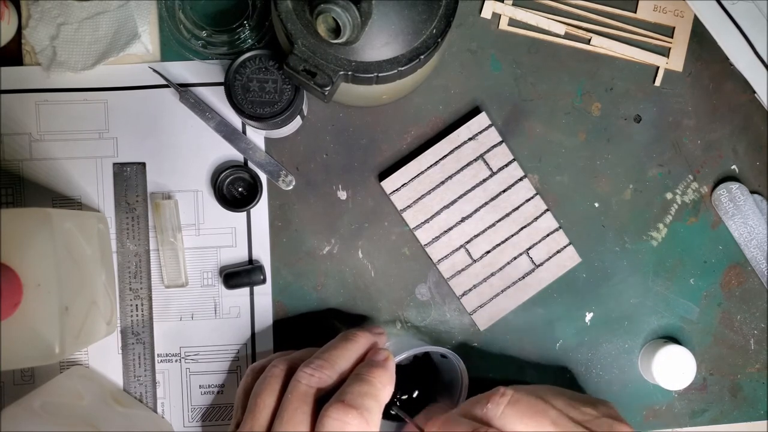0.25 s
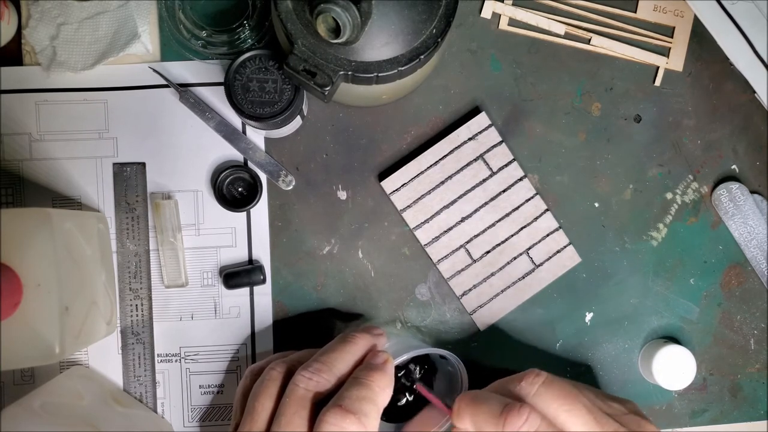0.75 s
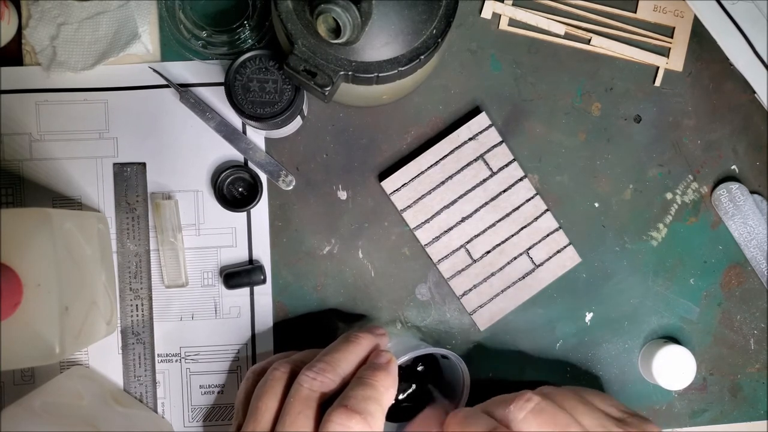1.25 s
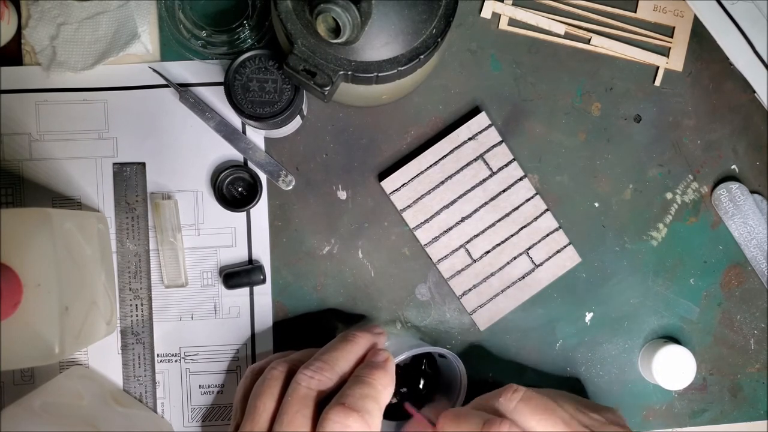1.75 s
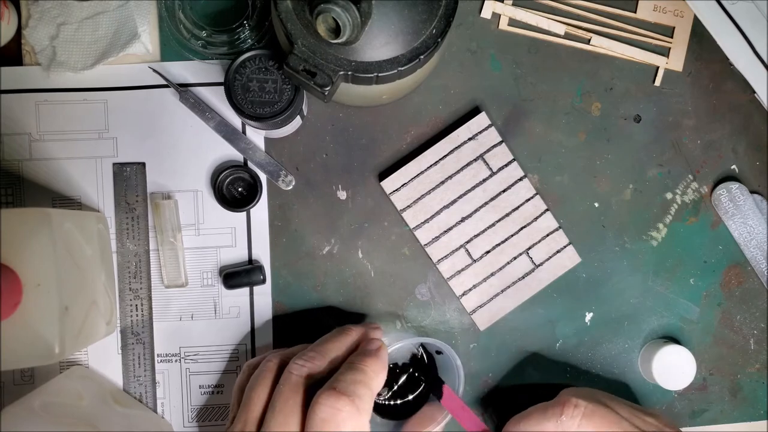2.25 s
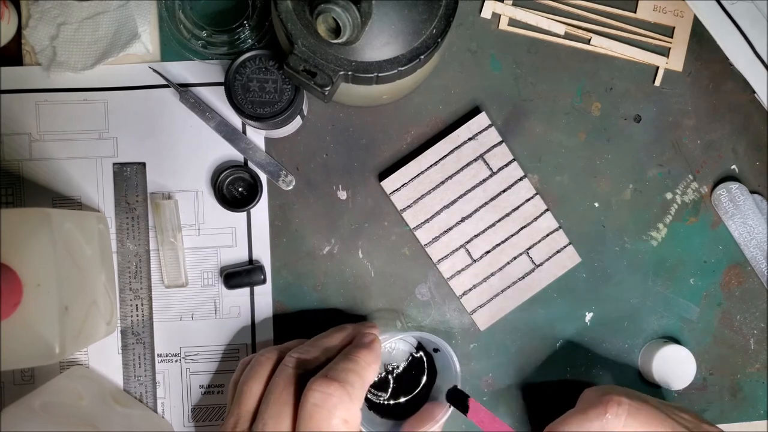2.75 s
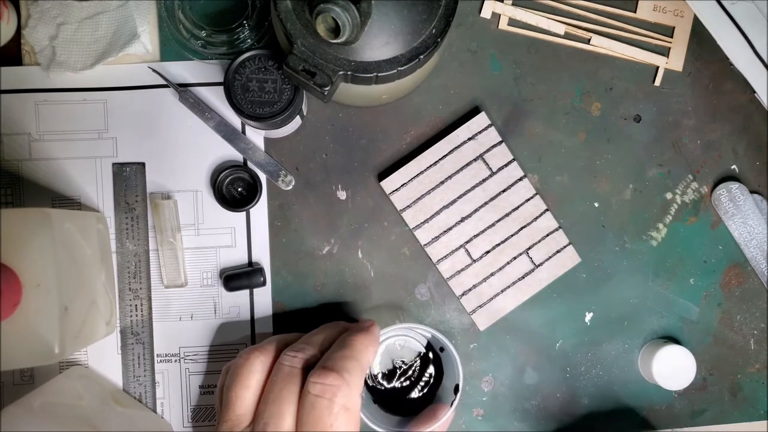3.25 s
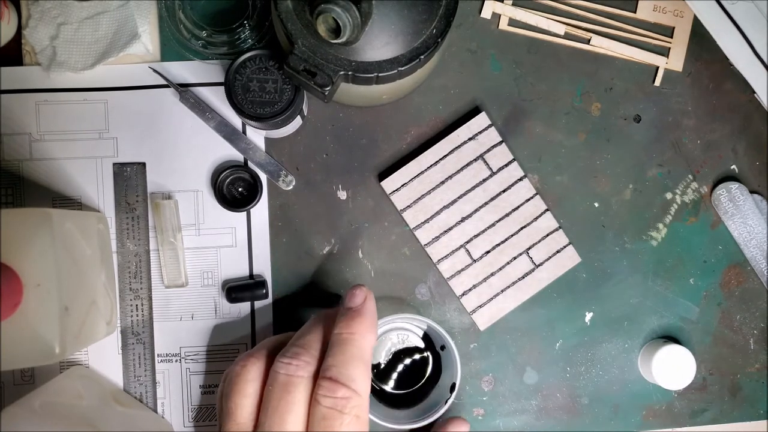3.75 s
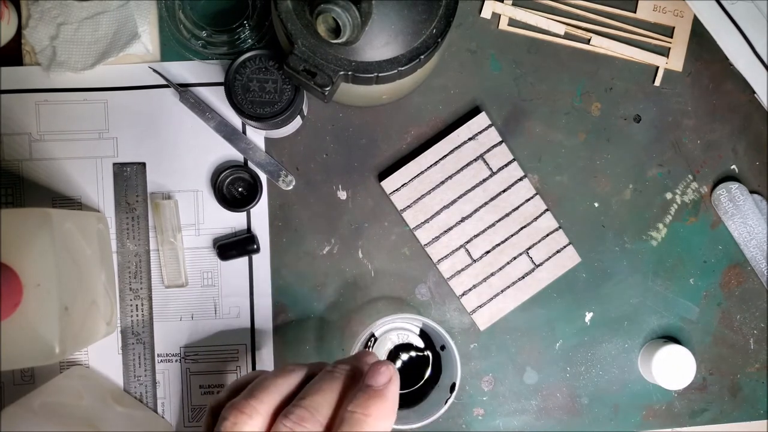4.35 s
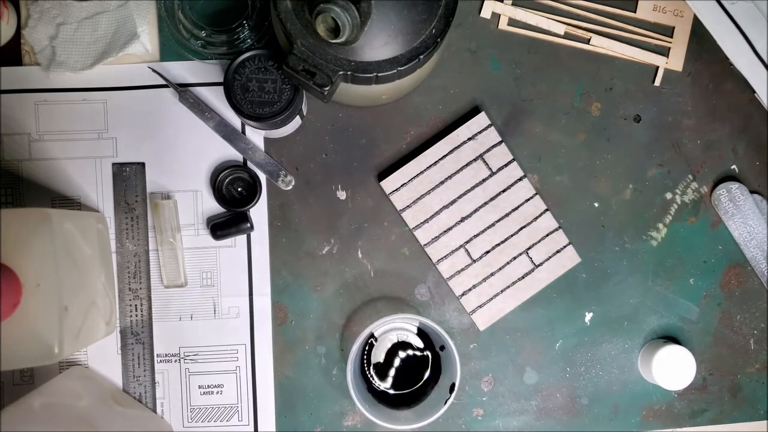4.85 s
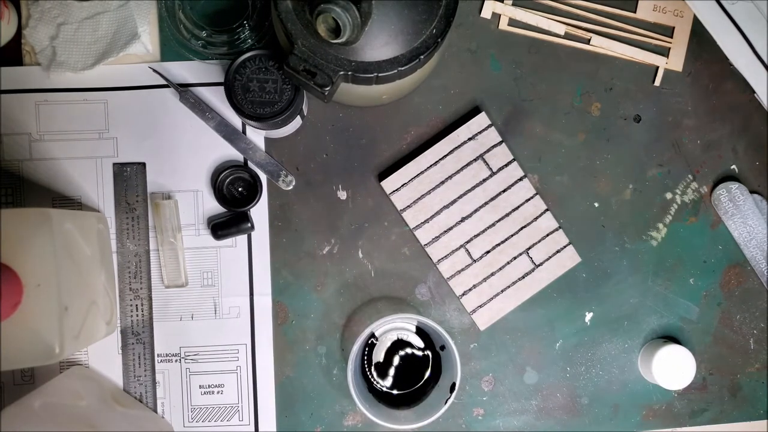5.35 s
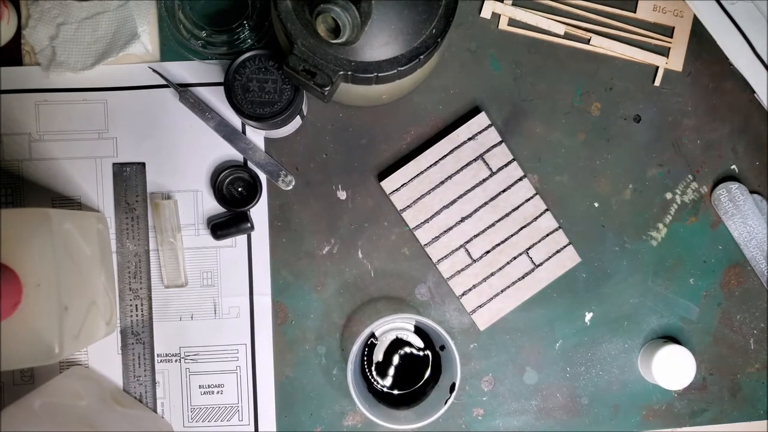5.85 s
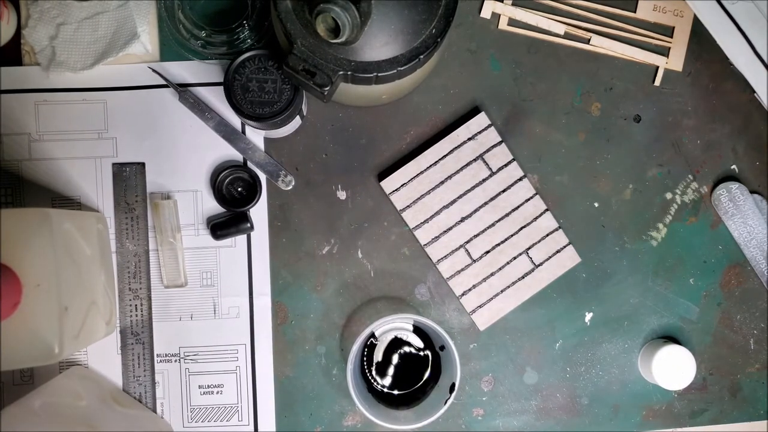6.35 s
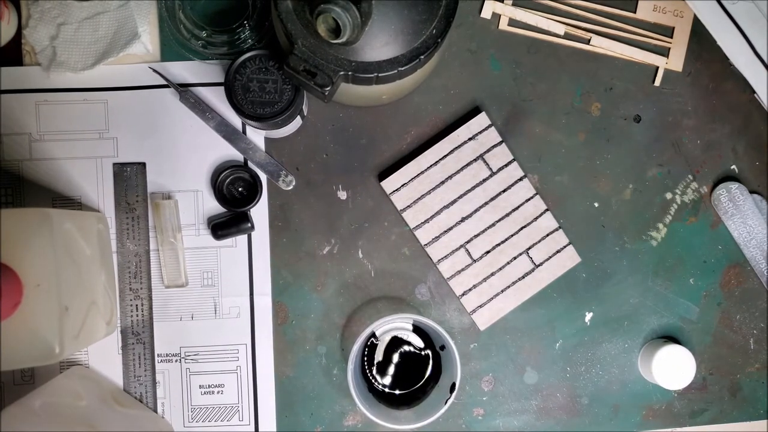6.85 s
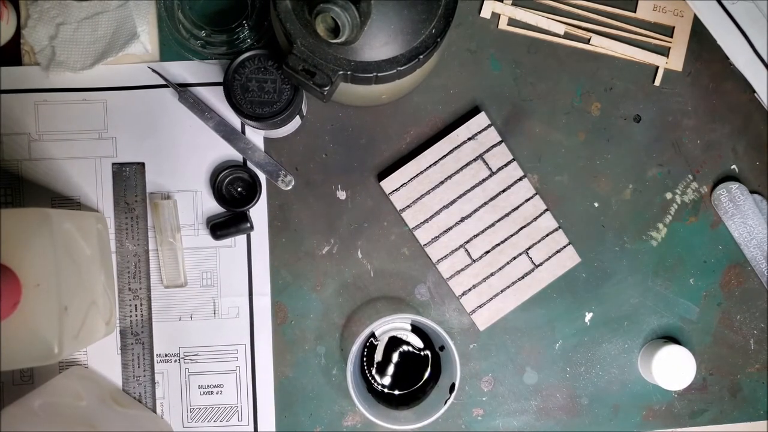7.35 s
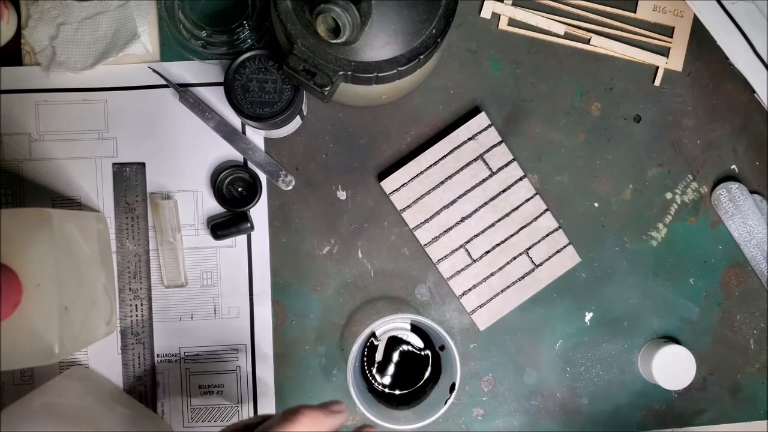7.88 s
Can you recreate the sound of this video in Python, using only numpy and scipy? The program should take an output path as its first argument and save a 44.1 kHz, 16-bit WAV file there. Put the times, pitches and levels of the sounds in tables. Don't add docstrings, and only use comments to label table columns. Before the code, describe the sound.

Close stereo in a small hard room: a stick stirs paint in a small plastic cup with irregular rounded taps and one stronger scrape, thinning out over two seconds. The stick is laid down with a bright hard tick and brief skitter. Later a cap snaps, small parts click to the left, and dull knocks shake the bench, over low fan hum and faint hiss.

```python
import sys
import numpy as np
from scipy import signal
from scipy.fft import rfft, irfft, next_fast_len
from scipy.io import wavfile
from scipy.ndimage import uniform_filter1d

SR = 44100
rng = np.random.default_rng(int(sys.argv[2]) if len(sys.argv) > 2 else 0)


def bounce(signal):
    frames = np.transpose(np.atleast_2d(signal))
    limited = np.clip(frames, -1, 1)
    pcm = np.round(limited * 32767).astype(np.int16)
    wavfile.write(sys.argv[1], SR, pcm)


def gain_from_db(level_db):
    decades = np.asarray(level_db, float) / 20
    return 10 ** decades


N = 357856

# t/s, peak level/dB, wall f/Hz, time to peak/s, rim crack level/dB
HIGH_TAPS = [(0.159, -25, 1660, 0.00083, -23.5), (0.2532, -50.5, 1890, 0.0017, -12),
             (0.3421, -24, 1830, 0.0014, -15.5), (0.3442, -25.5, 1930, 0.00064, -12.5),
             (0.4411, -40, 1900, 0.001, -38), (0.633, -52, 1860, 0.0013, -2.5),
             (0.6375, -33, 1873, 0.0016, -16), (0.8717, -57.5, 1780, 0.0012, -13),
             (1.032, -49.5, 1840, 0.0031, -16), (1.064, -38, 1780, 0.002, -1.5),
             (1.305, -38.5, 1840, 0.0011, -18), (1.7266, -51, 1820, 0.0021, -32),
             (1.9712, -41.5, 1900, .0014, -7), (2.2937, -56, 1920, .0018, -3.5),
             (3.14, -53.5, 1310, .002, -23)]
# t/s, peak level/dB, wall f/Hz, time to peak/s, bottom level/dB
LOW_TAPS = [(0.3519, -30, 1900, .0022, -12), (0.4645, -45, 1900, 0.0011, 5),
            (1.531, -37, 1800, 0.00056, -9.5), (1.5437, -48.5, 1800, 0.00081, 3),
            (1.7564, -52.5, 1840, 0.0025, 1), (1.9318, -41, 1790, 0.002, -4),
            (1.953, -37, 1600, 0.00077, 1), (2.3215, -54, 2500, 0.0028, 2),
            (2.9901, -52.5, 2510, 0.0018, -3.5), (3.38, -58, 1490, 0.00061, -10),
            (5.306, -56.5, 1930, 0.0025, 0), (5.316, -51.5, 1330, 0.00099, 0.5),
            (5.329, -64, 2000, 0.0022, 7)]
# f/Hz, level/dB per Hz
RIM_COLOUR = [(1500, -31), (2600, -1.5), (3500, -11), (5000, -11), (7500, -24), (9000, -34)]


def cup():
    out = np.zeros((2, N))
    t = np.arange(SR // 5) / SR
    high = [(*tap, -16 + 0.5 * (crack_db + 11), crack_db) for *tap, crack_db in HIGH_TAPS]
    low = [(*tap, -10.5) for tap in LOW_TAPS]
    bottom_hz = 993
    bottom_modes = [(bottom_hz, 0, 0.015), (1.08 * bottom_hz, -5, 0.02), (0.792 * bottom_hz, -1.5, 0.016)]
    for s, db, wall_hz, peak_s, bottom_db, crack_db in sorted(high + low):
        swell = (t / peak_s * np.exp(1 - t / peak_s)) ** 2
        wall = swell * np.sin(2 * np.pi * wall_hz * t)
        upper_wall = ping(hz=3230, db=-21.5, t60=0.011)
        bottom = strike(bottom_modes, rise_s=0.001)
        rim = crack(RIM_COLOUR, t60=0.039, rise_s=0.00044)
        tap = wall + upper_wall + gain_from_db(bottom_db + 1.5) * bottom + gain_from_db(crack_db) * rim
        add(out, tap, s, db, pan_db=5.5, lag_per_db=0.33)
    return signal.sosfilt(signal.butter(4, 7500, fs=SR, output="sos"), out)


# t/s, peak level/dB, rise/s, fall/s
DRAGS = [
    (0.02, -68, .1, .15),
    (0.37, -52.5, 0.046, .09),
    (0.411, -63.5, 0.024, 0.065),
    (0.47, -69.5, 0.032, .12),
    (1.066, -57.5, 0.026, .022),
    (2.992, -67, 0.027, .045),
    (5.308, -66, 0.011, .05),
]


def stirring():
    clicks = grains(per_s=1800, spread_db=3.5)
    wall = rms_one(bandpass(clicks, 1950, 2450))
    bottom = rms_one(bandpass(clicks, 1050, 1300))
    gain = swells([(*drag, 0) for drag in DRAGS])
    return gain * (wall + gain_from_db(-0.5) * bottom) * gain_from_db([[1.5], [-1.5]])


# t/s, peak level/dB, left-right level/dB
STICK_TICKS = [
    (3.2118, -25, 7.5),
    (3.2196, -33.5, 5),
    (3.2485, -46, 8.5),
    (3.2537, -43, -3),
]
# f/Hz, level/dB per Hz
STICK_COLOUR = [(590, -59), (1000, -34.5), (1110, -16), (1340, -7), (2330, -15), (2840, -2), (4070, -28),
                (5310, 5), (6330, -3.5), (8100, 0.5), (9170, -20.5), (13000, -14), (16000, -17)]


def stick_laid_down():
    out = np.zeros((2, N))
    for s, db, pan_db in STICK_TICKS:
        note = ping(hz=5560, db=-4.5, t60=0.012)
        add(out, note + gain_from_db(-4.5) * crack(STICK_COLOUR, t60=0.025, rise_s=0.0001), s, db, pan_db)
    return out


# t/s, peak level/dB, rise/s, fall/s, hold/s
SKATES = [
    (3.06, -73.5, .04, 0.06, 0.096),
    (3.222, -58.5, .01, 0.056, 0.042),
]


def skating():
    return swells(SKATES) * coloured(STICK_COLOUR, grains(per_s=2200, spread_db=1.5)) * gain_from_db([[2.5], [-2.5]])


# t/s, peak level/dB, left-right level/dB
CAP_TICKS = [
    (4.6672, -36, -6.5),
    (4.6712, -41, -4),
]
# f/Hz, level/dB per Hz
CAP_COLOUR = [(710, -17), (1200, -9), (1810, -10), (2230, -10), (3250, -0.5), (4310, -5), (6100, -16),
              (7330, -5.5), (9210, -13), (10800, -19), (11800, -5.5), (14700, -8), (16000, -20)]


def cap_snap():
    out = np.zeros((2, N))
    for s, db, pan_db in CAP_TICKS:
        note = ping(hz=7200, db=-4, t60=0.0086)
        add(out, note + crack(CAP_COLOUR, t60=0.013, rise_s=0.00065), s, db, pan_db)
    return out


# t/s, peak level/dB, left-right level/dB, brightness/dB per octave, ring level/dB
PART_TICKS = [
    (5.714, -43.5, 15.5, 2, -16),
    (5.743, -53.5, 18, 0, -17),
    (6.132, -33, 17, 6.5, -15),
    (7.0857, -44, 9, -6.5, -11),
]
# f/Hz, level/dB, t60/s
PART_MODES = [(3000, 13, 0.018), (3240, -3, 0.13), (3560, -36, 0.073), (7370, 1, 0.025), (7880, 0.5, 0.053)]
# f/Hz, level/dB per Hz
PART_COLOUR = [(1180, -85), (2000, -33), (2700, -16.5), (3330, 11.5), (3770, -26), (5310, -8.5),
               (6010, -10), (7300, 3), (8330, -11.5), (13000, -14), (16400, -12)]


def small_parts():
    out = np.zeros((2, N))
    for s, db, pan_db, tilt_db, ring_db in PART_TICKS:
        contact = crack(PART_COLOUR, t60=0.01, rise_s=0.00073, tilt_db=tilt_db)
        ring = strike(PART_MODES, rise_s=0.00094)
        add(out, contact + gain_from_db(ring_db) * ring, s, db, pan_db)
    return out


# t/s, peak level/dB, deep level/dB, upper level/dB, rattle level/dB
KNOCKS = [(5.713, -34, 7.5, -16.5, -12.5), (5.724, -52, -21, -30, -4), (6.134, -50, 5, -6, -2),
          (6.885, -40.5, -11, -1, -10), (6.896, -43, -22, -28, -8), (7.003, -40.5, -21, -5.5, -4),
          (7.085, -27.5, 5.5, -4, -3), (7.091, -30, -3, -24, -5.5), (7.126, -46, -15, 0, -9),
          (7.209, -52, -21, 0, -13), (7.266, -57, -7, 6, -8)]
# f/Hz, level/dB, t60/s
BENCH_MODES = [(187, 3.5, 0.036), (236.4, -9.5, 0.076), (262, -3, 0.065), (450.3, 5.5, 0.053),
               (697, -10, 0.036), (816, -6, 0.068), (954, -8.5, 0.044), (1243, 14, 0.021), (1463, 3, 0.046),
               (1490, 1.5, 0.022), (1600, -13, 0.022)]
# f/Hz, level/dB per Hz
RATTLE_COLOUR = [(120, -23), (200, 6), (301, -5.5), (369, -7.5), (467, -4.5), (658, -5), (702, -19.5),
                 (1240, -14.5), (2600, -53), (3380, -79), (5720, -120)]


def knocks():
    out = np.zeros((2, N))
    for s, db, deep_db, upper_db, rattle_db in KNOCKS:
        modes = [(hz, level_db + (hz < 350) * deep_db + (hz > 1000) * upper_db, t60)
                 for hz, level_db, t60 in BENCH_MODES]
        board = strike(modes, rise_s=0.0047)
        rattle = crack(RATTLE_COLOUR, t60=0.079, rise_s=0.0019)
        add(out, board + gain_from_db(rattle_db) * rattle, s, db + 1.0, pan_db=-1.5)
    return out


# t/s, peak level/dB, rise/s, fall/s, thin
# dry top level/dB
SLIDES = [(2.128, -72.5, 0.039, 0.061, -5.5), (2.326, -71, 0.065, .05, -9), (3.13, -71, .04, 0.086, 1.5),
          (3.228, -56.5, 0.046, 0.054, -5), (3.33, -74, 0.039, 0.25, -3.5), (4.48, -72, 0.17, 0.074, -28),
          (4.54, -69.5, 0.071, 0.097, -5), (5.155, -71.5, 0.025, 0.11, -34), (5.313, -68, .03, 0.047, -21),
          (5.712, -74, 0.027, 0.12, -2), (6.12, -77, 0.019, .05, 4), (6.145, -79, 0.029, 0.13, 11.5),
          (6.9, -81, 0.03, 0.037, -6), (7.095, -65, .03, 0.04, -8.5), (7.48, -68.5, 0.037, 0.12, -25)]
# f/Hz, level/dB per Hz
SLIDE_COLOUR = [(1180, -29.5), (2000, -5.5), (3580, -6.5), (3980, -2.5), (7910, -8), (8930, -13.5),
                (12000, -5.5), (16000, -0.5)]
# t/s, left-right level/dB
HANDS = [
    (2.0, 0),
    (3.3, 2),
    (4.6, -2.5),
    (5.1, 9),
    (7.1, 13),
    (7.5, 3.5),
]


def slides():
    rub = gain_from_db(8.5 + 2.0 * drift(28)) * coloured(SLIDE_COLOUR, grains(per_s=3900, spread_db=0.5))
    body = signal.sosfilt(signal.butter(4, 9000, fs=SR, output="sos"), rub)
    top = signal.sosfilt(signal.butter(4, 9000, "high", fs=SR, output="sos"), rub)
    body_gain = swells([(s, db, rise_s, fall_s, 0) for s, db, rise_s, fall_s, _ in SLIDES])
    top_gain = swells([(s, db + top_db, rise_s, fall_s, 0) for s, db, rise_s, fall_s, top_db in SLIDES])
    pan_db = np.interp(np.arange(N) / SR, *np.transpose(HANDS))
    return (body_gain * body + top_gain * top) * gain_from_db(pan_db / 2 * np.array([[1], [-1]]))


# t/s, level/dB, hold/s, left-
# right level/dB
BUMPS = [(2.2, -61, .2, -1), (2.43, -50, 0.036, 16), (2.6, -48.5, 0.02, 14.5), (3.335, -55.5, 0.036, 0.5),
         (5.25, -48.5, .03, 16), (5.41, -48.5, 0.015, 17.5), (5.53, -55, 0.13, 6.5),
         (5.728, -36.5, 0.014, -3), (5.85, -48.5, 0.0086, 8), (6.94, -40.5, 0.013, -4),
         (7.03, -52, 0.015, -4.5), (7.124, -35.5, 0.088, -3), (7.249, -39, 0.027, 10.5),
         (7.39, -43, 0.0033, -3), (7.46, -52, 0.18, -7)]


def bumps():
    rise_s, fall_s = 0.048, 0.062
    mid, side = bandpass(rng.standard_normal((2, N)), 28, 85)
    shake = rms_one(mid + 0.85 * side * np.array([[1], [-1]]))
    weight = [swells([(s, db + sign * pan_db / 2, rise_s, fall_s, hold_s) for s, db, hold_s, pan_db in BUMPS])
              for sign in (1, -1)]
    return weight * shake * gain_from_db(1.5 + 2 * drift(9))


# f/Hz, level/dB per Hz
HUM_COLOUR = [(11, -26), (18, -9.5), (32, -3.5), (49, -26), (69, -2), (118, 2.5), (150, -13), (183, -4.5),
              (206, -18.5), (236, -16), (314, -24), (353, -14.5), (384, -24.5), (432, -15), (1000, -37.5),
              (1300, -43.5), (2200, -120)]


def ventilation():
    return gain_from_db(-49.5 + 1.53 * drift(1.1)) * coloured(HUM_COLOUR, rng.standard_normal((2, N)))


# f/Hz, level/dB per Hz
HISS_COLOUR = [(410, -33), (700, -10), (1010, -21), (1520, -13.5), (2820, -31), (2930, -23), (3670, -31),
               (4830, -24), (5300, -35.5), (7970, -32.5), (9210, -53.5), (12300, -31), (16200, -22.5)]


def hiss():
    return gain_from_db(-71) * coloured(HISS_COLOUR, rng.standard_normal((2, N)))


def treble_holes(x, margin=1.3, shared=0.64, duck=0.14, bass_db=-53.5, hole_db=-34.5):
    hz, _, cells = signal.stft(x, SR, nperseg=2048, noverlap=1536)
    bass = 10 * np.log10(np.sum(np.abs(cells[0, hz < 150]) ** 2, axis=0) + 1e-12)
    band = np.digitize(hz, np.geomspace(2200, 16500, 26))
    luck = rng.standard_normal((28, cells.shape[2]))
    luck = uniform_filter1d(shared * luck[27] + luck, size=5, axis=1)
    urge = luck * 2.2 + duck * np.maximum(bass - bass_db, 0)
    dropped = np.clip(4 * (urge[band] - margin - 0.9 * (hz[:, None] > 12000)), 0, 1)
    dropped = dropped * (band[:, None] > 0)
    return signal.istft(cells * gain_from_db(hole_db * dropped), SR, nperseg=2048, noverlap=1536)[1][:, :N]


# f/Hz, t60/s
ROOM_T60 = [(150, 0.34), (600, 0.33), (2000, 0.31), (6000, 0.54), (14000, 0.085)]


def room(x, delay_s=0.0039):
    t, tail = np.arange(SR // 2) / SR, 0
    for low in 90 * 2.0 ** np.arange(8):
        band = bandpass(rng.standard_normal((2, len(t))), low, min(2 * low, 0.45 * SR))
        tail = tail + band * gain_from_db(-60 * t / at_hz(ROOM_T60, 1.47 * low))
    tail = tail * np.clip(t / delay_s - 1, 0, 1)
    tail = tail / np.sqrt(np.sum(tail ** 2) / 2)
    return signal.fftconvolve(x.mean(axis=0)[None], tail, axes=1)[:, :N]


def strike(modes, rise_s):
    t = np.arange(SR // 5)[:, None] / SR
    hz, db, t60 = np.transpose(modes)
    luck = rng.standard_normal((2, len(hz)))
    swell = 1 - np.exp(-(t / rise_s) ** 2)
    decay = gain_from_db(db + 1.5 * luck[0] - 60 * t / t60)
    ring = (swell * decay * np.sin(2 * np.pi * hz * t + 0.6 * luck[1])).sum(axis=1)
    return ring / np.abs(ring).max()


def crack(spectrum, t60, rise_s, tilt_db=0.0):
    t = np.arange(SR // 5) / SR
    hz = np.arange(len(t) // 2 + 1) * 5 + 1
    colour = gain_from_db(at_hz(spectrum, hz) + tilt_db * np.log2(hz / 5000))
    burst = irfft(rfft(rng.standard_normal(len(t))) * colour, len(t))
    burst = burst * (1 - np.exp(-(t / rise_s) ** 2)) * gain_from_db(-60 * t / t60)
    return burst / np.abs(burst).max()


def ping(hz, db, t60):
    t = np.arange(SR // 5) / SR
    return gain_from_db(db - 60 * t / t60) * np.sin(2 * np.pi * hz * t)


def grains(per_s, spread_db):
    sizes = gain_from_db(spread_db * np.minimum(rng.exponential(1, (2, N)), 5))
    signs = rng.choice([-1, 1], (2, N))
    return sizes * signs * (rng.random((2, N)) < per_s / SR)


def swells(rows):
    t, out = np.arange(N) / SR, np.zeros(N)
    for s, db, rise_s, fall_s, hold_s in rows:
        away = np.maximum((s - t) / rise_s, (t - s - hold_s) / fall_s)
        out += gain_from_db(db - 20 * np.maximum(0, away))
    return out


def drift(rate_hz):
    knots = rng.standard_normal(int(N / SR * 60))
    slow = rms_one(signal.lfilter([1], [1, -np.exp(-2 * np.pi * rate_hz / 60)], knots))
    return np.interp(np.linspace(0, len(slow) - 1, N), np.arange(len(slow)), slow)


# f/Hz, correlation
LIKENESS = [(60, 0.97), (150, 0.96), (380, 0.85), (950, 0.14), (2380, -0.095), (5980, 0.088),
            (15000, -0.032)]


def coloured(spectrum, source):
    size = next_fast_len(N, True)
    hz = np.arange(size // 2 + 1) * SR / size
    padded = np.pad(source, ((0, 0), (0, size - N)), "wrap")
    mid, side = rfft(padded, size) * gain_from_db(at_hz(spectrum, hz))
    alike = np.clip(at_hz(LIKENESS, hz), -1, 1)
    pair = np.sqrt(1 + alike) * mid + np.sqrt(1 - alike) * side * [[1], [-1]]
    return rms_one(irfft(pair, size)[:, :N])


def add(out, sound, s, db, pan_db, lag_per_db=0.13):
    for side, sign in enumerate((1, -1)):
        at = round(s * SR + sign * lag_per_db * pan_db)
        out[side, at:at + len(sound)] += gain_from_db(db + sign * pan_db / 2) * sound[:N - at]


def bandpass(x, low_hz, high_hz):
    return signal.sosfilt(signal.butter(2, [low_hz, high_hz], "band", fs=SR, output="sos"), x)


def rms_one(x):
    return x / np.sqrt(np.mean(x ** 2) + 1e-20)


def at_hz(points, hz):
    table_hz, values = np.array(points).T
    return np.interp(np.log(np.maximum(hz, 1)), np.log(table_hz), values)


def scene():
    near = cup() + stirring()
    hard = stick_laid_down() + cap_snap() + small_parts()
    far = knocks()
    wet = room(gain_from_db(-10) * near + gain_from_db(-11.5) * hard + gain_from_db(-1.5) * far)
    bed = treble_holes(bumps() + ventilation() + hiss())
    return near + hard + far + wet + slides() + skating() + bed


def roll_off(x):
    return signal.sosfilt(signal.butter(12, 16660, fs=SR, output="sos"), x)


def record(dry):
    cut = signal.sosfilt(signal.cheby2(10, 40, 16100, fs=SR, output="sos"), dry)
    return roll_off(cut)


dry = scene()
out = record(dry)
bounce(out)
```